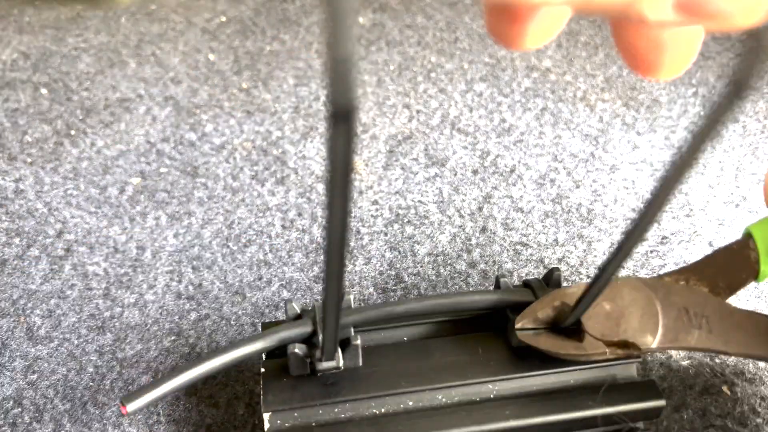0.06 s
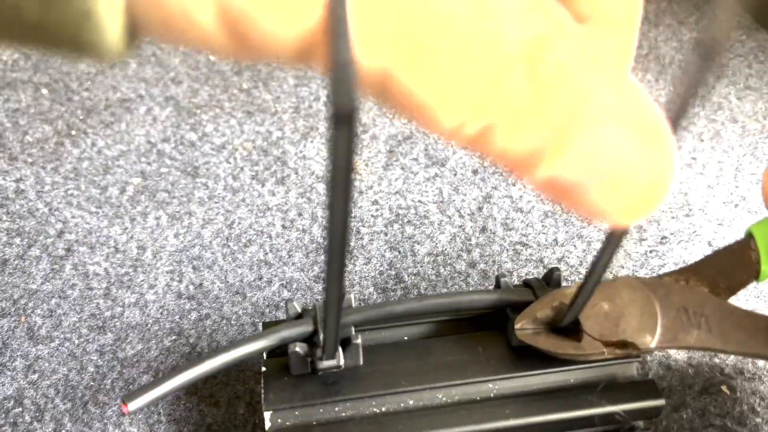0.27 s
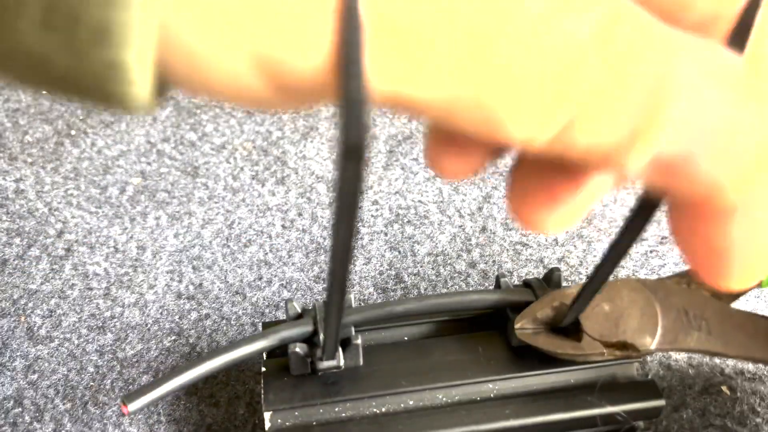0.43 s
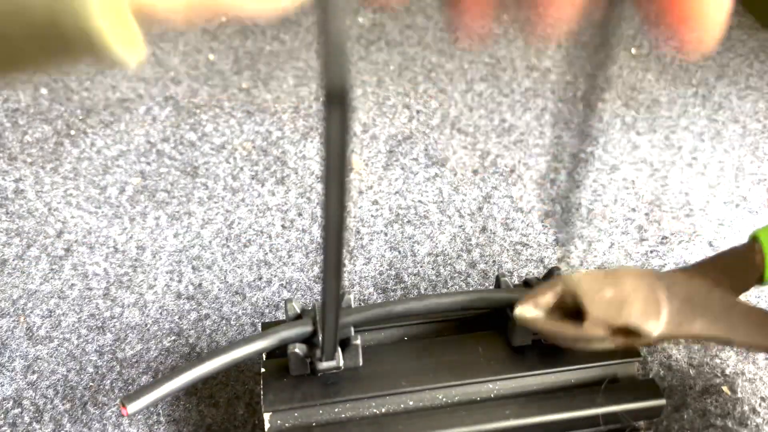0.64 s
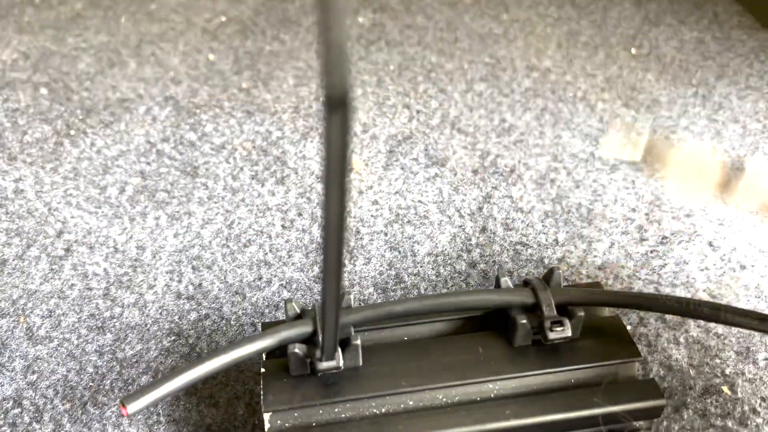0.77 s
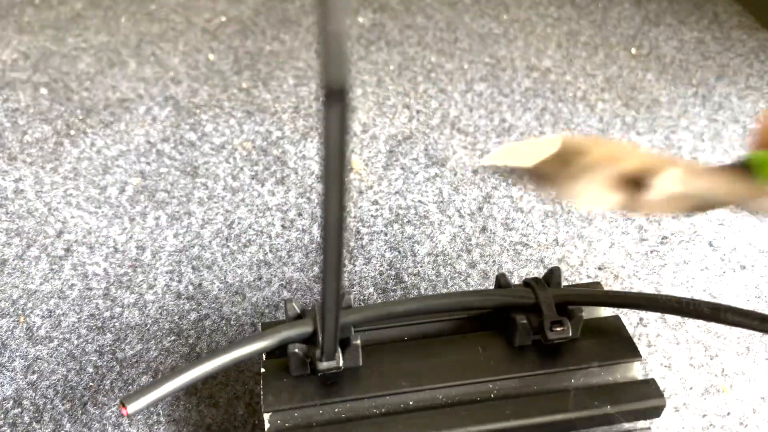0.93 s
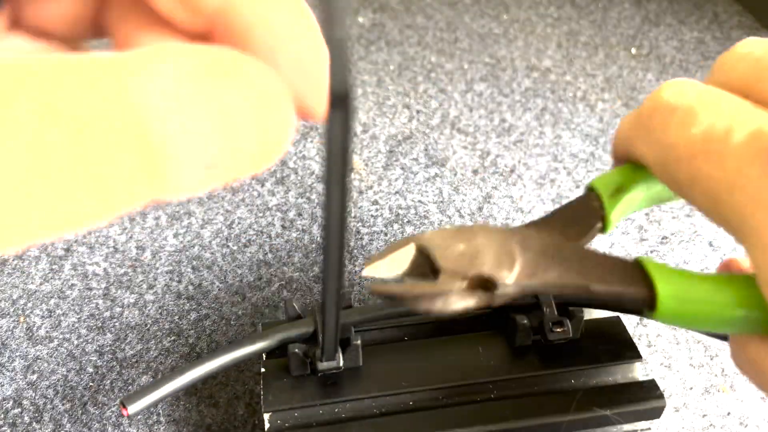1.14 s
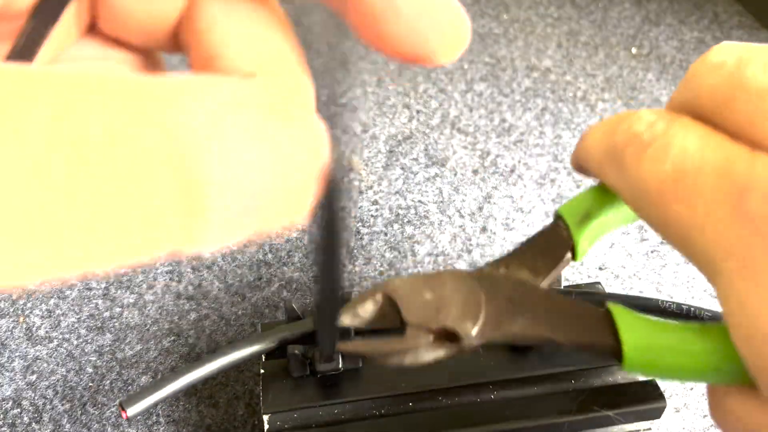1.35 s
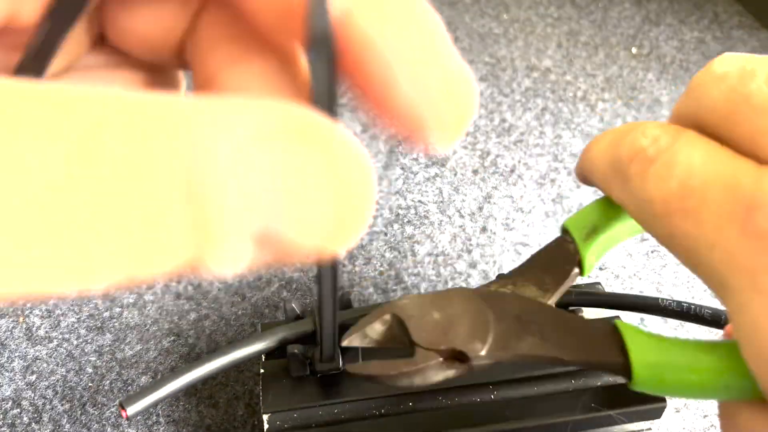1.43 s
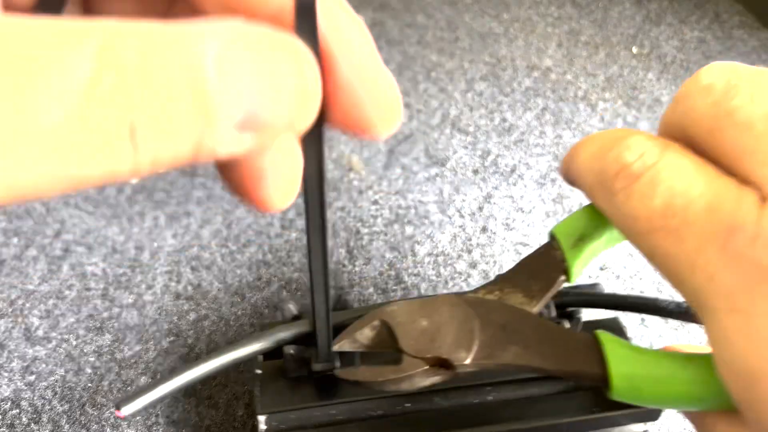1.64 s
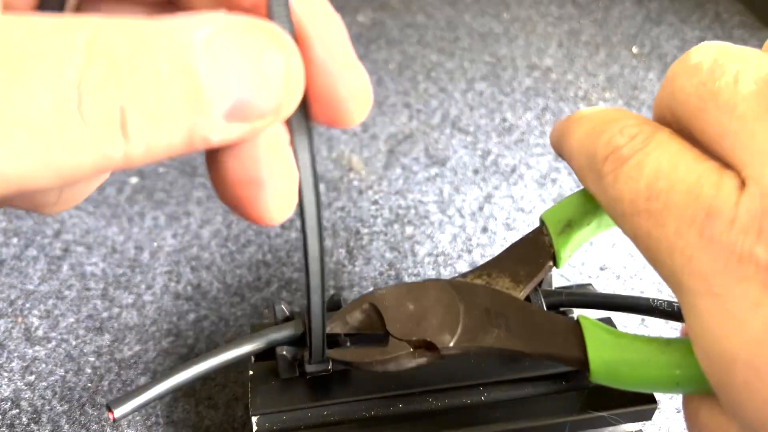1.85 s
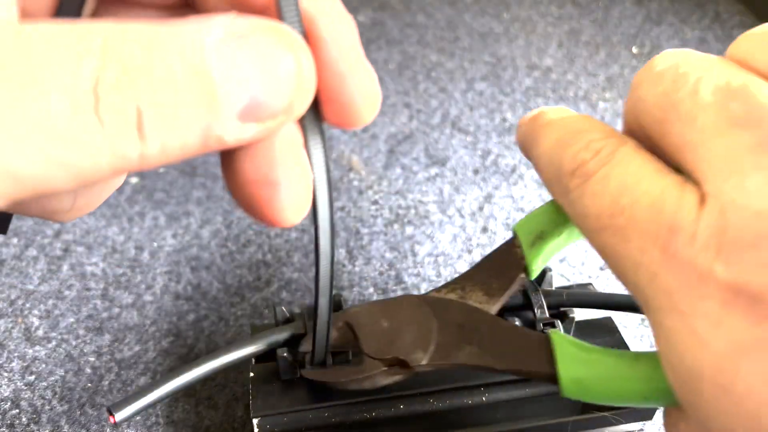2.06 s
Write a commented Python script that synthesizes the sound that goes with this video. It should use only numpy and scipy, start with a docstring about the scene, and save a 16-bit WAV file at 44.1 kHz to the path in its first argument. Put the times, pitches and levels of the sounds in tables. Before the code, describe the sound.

Side cutters snap through a nylon cable tie with one loud, dry crack and short steely ring, then small plastic ticks and faint scrapes as tool and cable are handled, close up in a quiet room.

```python
"""Side cutters snip the tail off a nylon cable tie, close to a small stereo microphone in a quiet room.
The strap cracks as filtered clicks; the steel jaws ring as decaying sines and beating mode crowds.
A short whistle swells into the cut; freed parts chatter as noise impacts and the mount thumps as low sines.
The loose tail slides as dense filtered grains; cutters tick and scrape as noise bursts and pitched knocks.
Shaped-noise reflections form the room, over noise hiss, an uneven low rumble and a wavering hum."""
import sys
import numpy as np
from scipy import signal
from scipy.fft import rfft, irfft
from scipy.io import wavfile

SR = 44100
rng = np.random.default_rng(int(sys.argv[2]) if len(sys.argv) > 2 else 0)


def file_out(sig):
    """Save sig as 16-bit WAV at sys.argv[1]."""
    # one column per channel
    cols = np.atleast_2d(sig).T
    # limit, then scale
    lim = np.clip(cols, -1, 1)
    pcm = np.round(lim * 32767).astype(np.int16)
    wavfile.write(sys.argv[1], SR, pcm)


N = 92610
EDGE_HZ = 15900  # upper band limit

# Strap parting in two steps: (time [s], level [dB])
STRAP_CRACKS = [(0.4374, 5.5), (0.4381, -1.5)]
# Crack spectrum: (frequency [Hz], level [dB])
CRACK_SPECTRUM = [(150, -29), (600, -22.5), (1200, -43.5), (3300, -16), (5200, -10), (6400, -20),
                  (7800, 0.5), (8600, -9.5), (9900, 4), (11000, -5.5), (12800, -12.5), (16000, -14)]
# Modes of cutters and mount: (frequency [Hz], peak level [dB], T60 [s])
TOOL_MODES = [(1800, -42, .14), (1896, -25, .028), (2560, -26, .022), (3080, -37, 0.019), (3913, -42, .08),
              (4380, -40, .07), (4500, -39, .07), (5250, -37, .08), (5590, -31, .07), (6250, -46.5, .08),
              (7760, -29, 0.013)]
# Crack energy spread into the room: (frequency [Hz], level [dB])
SPREAD_SPECTRUM = [(150, 1.5), (450, -2), (1000, -6.5), (1450, -10), (1850, -3), (2300, -6.5), (3200, -5),
                   (4000, -2), (4700, -1.5), (5350, 2.5), (6100, 1), (7200, -2.5), (10000, -14.5),
                   (13000, -5.5), (16000, -18.5)]
SPREAD_DB, RESTRIKE_DB = -0.5, -2
RING_SCATTER = .01  # pitch scatter of restruck modes, rms share
CRACK_LAG_S, RING_LAG_S = 0.0001498, .00007
CRACK_LEFT_DB, RING_LEFT_DB = 0, 3  # left over right


def snip():
    """The nylon cracks, the jaws slam shut and ring, each rebound strikes them again, the room answers."""
    crack, ringing, spread = np.zeros((3, N))
    for s, db in STRAP_CRACKS:
        add(crack, s, amp(db) * pulse(CRACK_SPECTRUM))
    for hz, db, t60 in TOOL_MODES:
        add(ringing, STRAP_CRACKS[-1][0], ring(hz, db, t60))
        for s, rebound_db, _ in REBOUNDS[1:]:
            struck_hz = hz * (1 + RING_SCATTER * rng.standard_normal())
            add(ringing, s, ring(struck_hz, db + rebound_db + RESTRIKE_DB, t60))
    add(spread, STRAP_CRACKS[0][0], amp([SPREAD_DB]))
    direct = ports(crack, CRACK_LAG_S, CRACK_LEFT_DB) + ports(ringing, RING_LAG_S, RING_LEFT_DB)
    return direct + room(spread, SPREAD_SPECTRUM)


# Crowds of close steel modes: (centre [Hz], half width [Hz], level [dB], T60 [s])
MODE_CROWDS = [(1840, 90, -46, .27), (5330, 420, -38, .27)]


def shimmer():
    """Close modes of the jaws beat against each other in a rough, lingering ring."""
    hz, t = np.fft.rfftfreq(N, 1 / SR), np.arange(N) / SR
    out = np.zeros((2, N))
    for centre_hz, half_width_hz, db, t60 in MODE_CROWDS:
        resonance = 1 / (1 + ((hz - centre_hz) / half_width_hz) ** 2)
        crowd = evened(irfft(rfft(rng.standard_normal((2, N))) * resonance, N))
        add(out, STRAP_CRACKS[-1][0], amp(db - 60 * t / t60) * crowd)
    return out


WHISTLE_HZ, WHISTLE_DB = 5425, -29.5
WHISTLE_RISE_S, WHISTLE_FALL_S = 0.0042, 0.0024
WHISTLE_SIDE_DB = 8.5  # added left, taken off right


def whistle():
    """A thin sine swells exponentially into the cut and dies just after it."""
    t = np.arange(N) / SR - STRAP_CRACKS[0][0]
    swell = np.exp(-abs(t) / np.where(t < 0, WHISTLE_RISE_S, WHISTLE_FALL_S))
    tone = amp(WHISTLE_DB) * swell * np.sin(2 * np.pi * WHISTLE_HZ * t)
    return amp([[WHISTLE_SIDE_DB], [-WHISTLE_SIDE_DB]]) * tone


# Freed parts rebounding after the cut: (time [s], level [dB], T60 [s])
REBOUNDS = [(0.4388, -11, .02), (0.4425, -17, .012), (0.449, -14.5, .03), (0.455, -18, .025),
            (0.4625, -18, .04), (0.4746, -24, .04)]
# Chatter spectrum: (frequency [Hz], level [dB])
CHATTER_SPECTRUM = [(200, -3), (500, -4), (1100, -8.5), (1850, -11), (3000, -8), (4000, -2), (5400, 1),
                    (6800, -7), (10000, -12), (16000, -13)]
# Mount recoiling on the carpet and rocking back: (time [s], frequency [Hz], peak level [dB], T60 [s])
MOUNT_THUMPS = [(0.4403, 244, -37.5, 0.022), (0.449, 62.07, -39.5, .2), (0.45, 96.1, -39, 0.37),
                (.449, 176, -34.5, 0.051), (.449, 295, -40, .07), (0.462, 460, -41.5, 0.089),
                (.461, 614, -45, 0.079)]
CHATTER_SIDE_DB = 3  # added left, taken off right


def recoil():
    """Freed parts chatter as dying runs of impacts; the mount thumps as low modes."""
    out = np.zeros((2, N))
    for s, db, t60 in REBOUNDS:
        for side, gain in zip(out, amp([CHATTER_SIDE_DB, -CHATTER_SIDE_DB])):
            chatter = signal.fftconvolve(rattle(t60), pulse(CHATTER_SPECTRUM))
            add(side, s, gain * amp(db) * chatter)
    for s, hz, db, t60 in MOUNT_THUMPS:
        add(out, s, ring(hz, db, t60))
    return out


# Nylon and steel contacts: (time [s], level [dB], tilt above 1 kHz [dB/octave], body level [dB])
CONTACTS = [(0.0511, -33.5, -1, -42), (0.0901, -33, 2, -38), (0.159, -42.5, 5, -53),
            (0.1761, -39.5, -3, -33), (.3090, -41, -4.5, -45), (0.4147, -41, 2, -33),
            (0.6215, -37, 2.5, -31), (0.6768, -32, 7, -46), (0.7512, -33.5, -3, -33.5),
            (0.8252, -35, -8, -37), (0.8736, -33.5, 3.5, -46), (1.028, -34, 9.5, -44),
            (1.1655, -36.5, 4, -44), (1.3621, -34.5, 5.5, -42.5), (1.3690, -38.5, 2, -33),
            (1.4103, -32, 12, -38), (1.4310, -32, 0, -33), (1.4356, -41, 7, -43), (1.5229, -39.5, 3, -48),
            (1.6108, -40, -2, -44), (1.6629, -23.5, 3, -52), (1.6650, -24.5, -0.5, -52),
            (1.9354, -39.5, 2.5, -49), (1.9622, -34, 1, -35), (1.9698, -34, 4.5, -32.5),
            (2.0073, -34.5, 4, -52)]
# Contact spectrum: (frequency [Hz], level [dB])
CONTACT_SPECTRUM = [(200, -9.5), (1300, -9), (2200, -3.5), (4000, 6), (6000, -5.5), (8000, -2), (10000, -4),
                    (12500, -3), (16000, -5.5)]
# Plastic mount under each contact: (frequency [Hz], level [dB])
BODY_SPECTRUM = [(200, 1.5), (600, 0.5), (1300, 0.5), (2200, 2), (3200, -5), (4300, -7.5), (6000, -22),
                 (16000, -29)]
# Handles and jaws knocking the mount: (time [s], level [dB], frequency [Hz], T60 [s])
MOUNT_KNOCKS = [(.050, -50, 1316, .04), (.090, -48, 1290, 0.035), (.309, -51, 2310, 0.023),
                (.621, -48, 3300, .016), (.752, -46, 3200, .012), (0.825, -48, 3000, .02),
                (1.3690, -51, 3300, .008), (1.4310, -45, 3400, .008), (1.6634, -39, 7690, .006),
                (1.6642, -42, 3900, .005), (1.6650, -42, 5600, .004), (1.9622, -44, 4300, .007),
                (1.9634, -57.5, 1605, 0.032), (1.966, -44, 318, 0.047), (1.97, -44, 4460, .007),
                (1.9705, -40, 785, 0.0091), (1.9714, -51.5, 1350, .025)]
TICK_T60_S, TICK_RING_T60_S, BODY_T60_S = .006, 0.088, 0.03
TICK_RING_DB = -13  # relative to the tick


def ticks():
    """Light contacts are noise bursts with a brief ring and a plastic body; knocks are single modes."""
    out = np.zeros(N)
    for s, db, tilt, body_db in CONTACTS:
        contact = burst(TICK_T60_S) + amp(TICK_RING_DB) * burst(TICK_RING_T60_S)
        add(out, s, amp(db) * signal.fftconvolve(contact, pulse(CONTACT_SPECTRUM, tilt)))
        body = signal.fftconvolve(burst(BODY_T60_S), pulse(BODY_SPECTRUM))
        add(out, s, amp(body_db) * body)
    for s, db, hz, t60 in MOUNT_KNOCKS:
        add(out, s, ring(hz, db, t60))
    return out


# Nylon on steel and skin: (time [s], rise [s], fall [s], level [dB], tilt above 1 kHz [dB/octave])
STROKES = [(.005, .03, 0.06, -63, -1), (.29, 0.054, 0.08, -67.5, -3), (.625, 0.018, 0.024, -48.5, 9),
           (.63, 0.041, 0.096, -64, 0.5), (.765, 0.021, 0.034, -58.5, 2), (.822, 0.039, 0.057, -61.5, 4.5),
           (1.03, 0.064, .12, -75, 3.5), (1.335, 0.077, .04, -69.5, -2), (1.495, 0.043, 0.043, -70.5, 3),
           (1.639, 0.025, 0.022, -58, 0), (1.71, 0.036, 0.028, -73.5, 4), (1.98, .02, 0.066, -85, 4)]
# Slide spectrum: (frequency [Hz], level [dB])
SLIDE_SPECTRUM = [(300, -6), (1500, 1.5), (2300, 1.5), (3200, 8), (4300, 4), (6000, -3), (8000, -1),
                  (10200, -5), (12300, 1), (14500, -2), (16000, -8)]
GRAINS_PER_S, GRAIN_SPREAD_DB = 17000, 1


def slides():
    """Dense tiny slips swell and fade under each stroke."""
    t, out = np.arange(N) / SR, np.zeros(N)
    for s, rise_s, fall_s, db, tilt in STROKES:
        grains = rng.standard_normal(N) * (rng.random(N) < GRAINS_PER_S / SR)
        slips = grains * amp(GRAIN_SPREAD_DB * np.minimum(rng.exponential(1, N), 3))
        stroke = np.exp(-((t - s) / np.where(t < s, rise_s, fall_s)) ** 2)
        scrape = evened(signal.oaconvolve(slips, pulse(SLIDE_SPECTRUM, tilt))[:N])
        out += amp(db) * stroke * scrape
    return out


def ports(x, lag_s, left_db):
    """Direct sound reaches the right port first; left_db is the left-over-right level."""
    hz = np.fft.rfftfreq(N, 1 / SR)
    left = irfft(rfft(x) * np.exp(-2j * np.pi * hz * lag_s), N)
    return np.array([amp(left_db / 2) * left, amp(-left_db / 2) * x])


# Room decay: (frequency [Hz], T60 [s])
ROOM_DECAY = [(200, 0.4), (1000, 0.02), (2000, 0.45), (5400, 0.24), (9000, 0.27), (15000, 0.2)]
REFLECTIONS_PER_S, ROOM_GAP_S = 4000, 0.0044
ROOM_WASH = .8  # diffuse noise relative to reflections, rms


def room(x, colour):
    """Separate reflections over a diffuse tail, each band dying at its own speed."""
    reflections = sparse((2, SR // 2), REFLECTIONS_PER_S)
    echoes = evened(reflections + ROOM_WASH * rng.standard_normal((2, SR // 2)))
    hz, t, bands = signal.stft(echoes, SR, nperseg=256)
    t60 = read(ROOM_DECAY, hz)[:, None]
    decay = amp(read(colour, hz)[:, None] - 60 * t / t60)
    bands = bands * decay * np.sqrt(np.log(1e6) / (t60 * SR))  # offsets the energy of longer decays
    tail = signal.istft(bands, SR, nperseg=256)[1]
    out = np.zeros((2, N))
    add(out, ROOM_GAP_S, signal.fftconvolve(x[None], tail, axes=1))
    return out


# Deep rumble level: (time [s], level [dB])
RUMBLE_LEVEL = [(0, -54), (.15, -50.5), (.23, -43.5), (.3, -47), (.5, -51.5), (.8, -49), (1.0, -47),
                (1.25, -53), (1.45, -65), (1.8, -58), (2.1, -56.5)]
RUMBLE_HZ, RUMBLE_OCTAVES = 67, .4  # centre, standard deviation
RUMBLE_WIDTH = .4  # side over mid amplitude


def rumble():
    """Deep band-limited noise follows an uneven level curve."""
    hz, t = np.fft.rfftfreq(N, 1 / SR), np.arange(N) / SR
    band = np.exp(-(np.log2((hz + 1) / RUMBLE_HZ) / RUMBLE_OCTAVES) ** 2 / 2)
    mid, side = irfft(rfft(rng.standard_normal((2, N))) * band, N)
    stereo = np.array([mid + RUMBLE_WIDTH * side, mid - RUMBLE_WIDTH * side])
    return amp(np.interp(t, *np.transpose(RUMBLE_LEVEL))) * evened(stereo)


# Rumble and hiss spectrum: (frequency [Hz], relative density [dB/Hz])
FLOOR_SPECTRUM = [(20, -32.5), (45, -11), (88, 1.5), (125, -1), (165, -7.5), (330, -14.5), (600, -19),
                  (1100, -21.5), (1800, -35), (2600, -42), (3700, -44), (5300, -48), (7500, -52.5),
                  (10300, -65), (12000, -48), (14500, -58), (16000, -59.5)]
# Left-right likeness of the floor: (frequency [Hz], correlation [-1 to 1])
FLOOR_LIKENESS = [(60, 0.97), (130, 0.81), (290, 0.7), (640, -0.41), (1400, -0.24), (4000, 0.43),
                  (15000, .2)]
# Low hum swelling and fading: (time [s], level [dB])
HUM_LEVEL = [(0, -62), (.45, -57), (.65, -49), (.9, -47.5), (1.15, -49), (1.35, -57), (1.5, -62),
             (2.1, -62)]
FLOOR_DB, HUM_HZ = -48.5, 117.4
HUM_WAVER = 0.017  # rms share of HUM_HZ


def background():
    """Steady shaped noise makes rumble and hiss; a frequency-wavering sine makes the hum."""
    hz, t = np.fft.rfftfreq(N, 1 / SR), np.arange(N) / SR
    a, b = rfft(rng.standard_normal((2, N)))
    same = np.clip(read(FLOOR_LIKENESS, hz), -1, 1)
    pair = np.array([a, same * a + np.sqrt(1 - same ** 2) * b])
    air = evened(irfft(pair * amp(read(FLOOR_SPECTRUM, hz)), N))
    waver = evened(irfft(rfft(rng.standard_normal(N)) * np.exp(-(hz / 10) ** 2), N))
    hum = evened(np.sin(2 * np.pi * np.cumsum(HUM_HZ * (1 + HUM_WAVER * waver)) / SR))
    return amp(FLOOR_DB) * air + amp(np.interp(t, *np.transpose(HUM_LEVEL))) * hum


def amp(db):
    """Decibels to gain."""
    return 10 ** (np.asarray(db) / 20)


def evened(x):
    """Scales to rms 1."""
    return x / np.sqrt(np.mean(x ** 2) + 1e-20)


def read(points, hz):
    """Reads a table on a log-frequency axis."""
    f, value = np.transpose(points)
    return np.interp(np.log(hz + 1), np.log(f), value)


def add(mix, s, sound):
    """Mixes a sound in at time s."""
    part = mix[..., round(s * SR):][..., :sound.shape[-1]]
    part += sound[..., :part.shape[-1]]


def pulse(colour, tilt=0, size=2048):
    """A causal minimum-phase click of energy 1 with the given colour."""
    hz = abs(np.fft.fftfreq(size, 1 / SR))
    level_db = read(colour, hz) + tilt * np.log2(np.clip(hz, 1000, EDGE_HZ))
    log_gain = np.log(amp(level_db))
    click = np.fft.ifft(np.exp(np.conj(signal.hilbert(log_gain)))).real
    return click / np.linalg.norm(click)


def ring(hz, db, t60):
    """One struck mode: an exponentially dying sine."""
    t = np.arange(SR // 2) / SR
    return amp(db - 60 * t / t60) * np.sin(2 * np.pi * hz * t)


def burst(t60):
    """Dying noise of energy 1."""
    t = np.arange(SR // 4) / SR
    x = rng.standard_normal(len(t)) * amp(-60 * t / t60)
    return x / np.linalg.norm(x)


def sparse(shape, per_s):
    """Tiny separate impacts at random moments, rms 1."""
    return evened(rng.standard_normal(shape) * (rng.random(shape) < per_s / SR))


RATTLE_PER_S = 7000


def rattle(t60):
    """A dying run of tiny impacts, energy 1."""
    t = np.arange(SR // 4) / SR
    x = sparse(len(t), RATTLE_PER_S) * amp(-60 * t / t60)
    return x / np.linalg.norm(x)


# Room response to handling: (frequency [Hz], level [dB])
ROOM_SPECTRUM = [(200, -9), (1000, -10.5), (2000, -6), (5400, -12), (7800, -14), (10000, -23.5),
                 (13000, -18.5), (16000, -20.5)]
HANDLING_LAG_S, HANDLING_LEFT_DB = 0.0001507, 4  # left lag, left over right


def scene():
    """Tool and tie close by, the room around them."""
    cut = snip() + shimmer() + whistle() + recoil()
    handling = ticks() + slides()
    direct = ports(handling, HANDLING_LAG_S, HANDLING_LEFT_DB)
    return cut + direct + room(handling, ROOM_SPECTRUM) + rumble() + background()


def record(dry):
    """The recorder's band limit, a linear-phase low-pass."""
    lowpass = signal.firwin(255, EDGE_HZ, window=("kaiser", 9), fs=SR)
    return signal.oaconvolve(dry, lowpass[None], "same", axes=1)


dry = scene()
out = record(dry)
file_out(out)
```